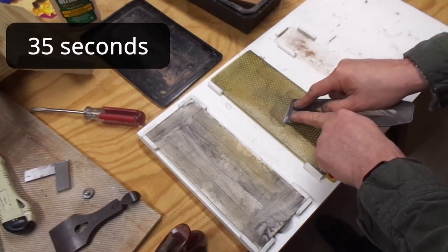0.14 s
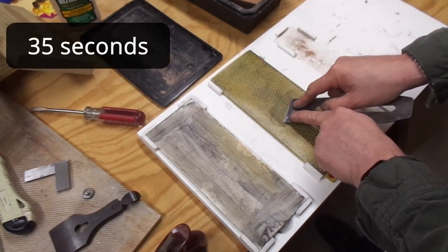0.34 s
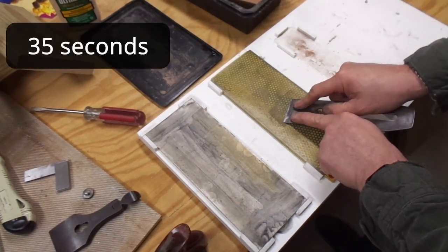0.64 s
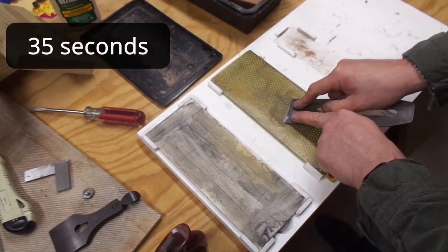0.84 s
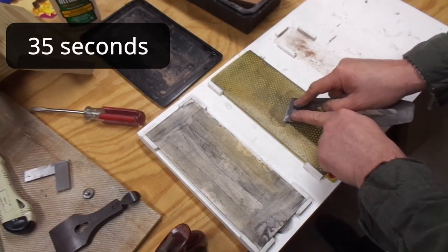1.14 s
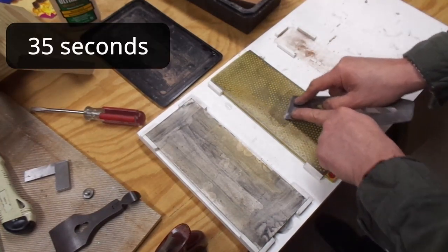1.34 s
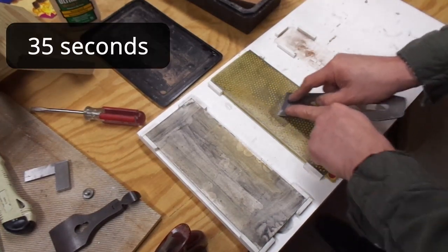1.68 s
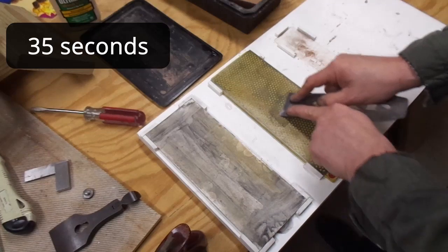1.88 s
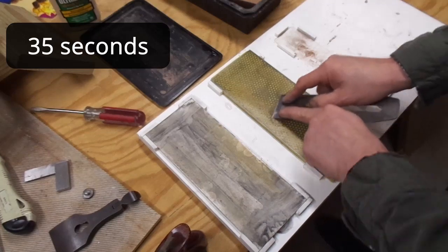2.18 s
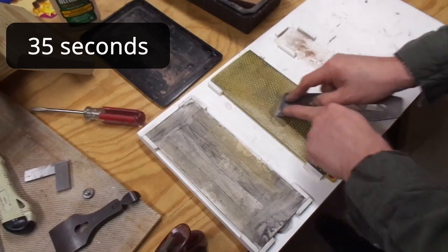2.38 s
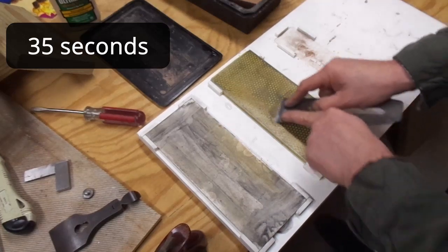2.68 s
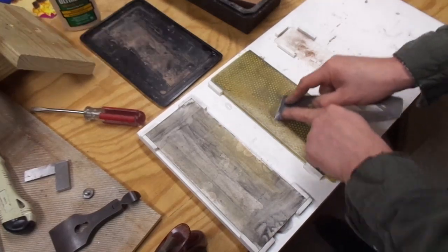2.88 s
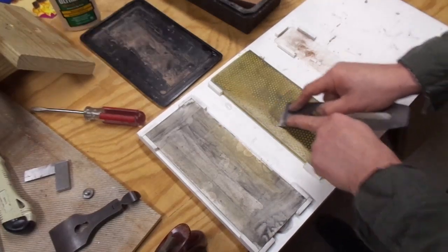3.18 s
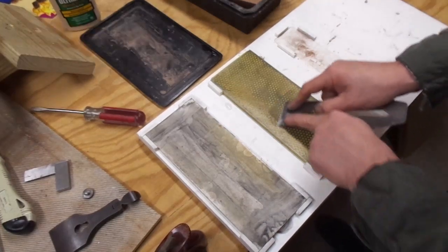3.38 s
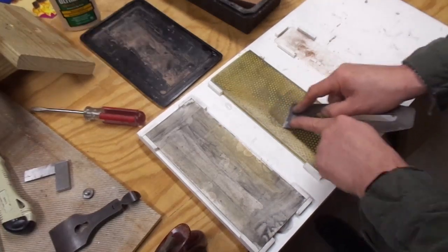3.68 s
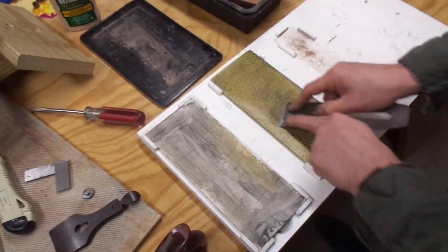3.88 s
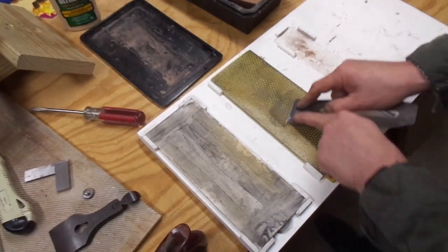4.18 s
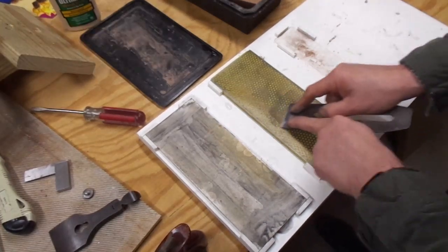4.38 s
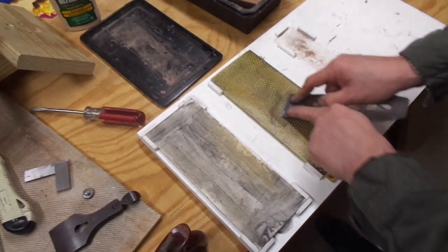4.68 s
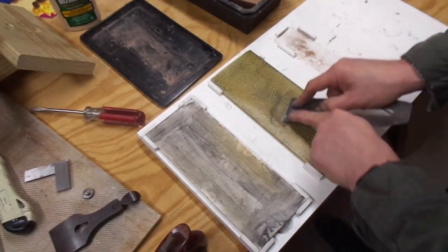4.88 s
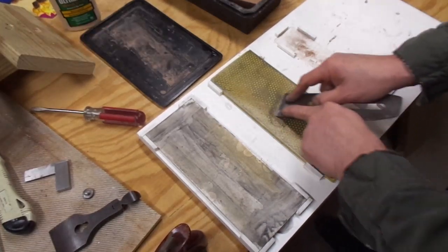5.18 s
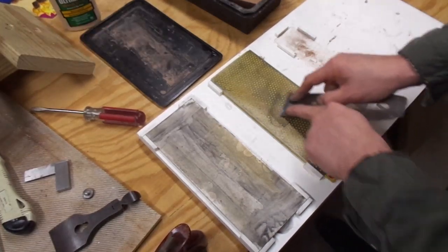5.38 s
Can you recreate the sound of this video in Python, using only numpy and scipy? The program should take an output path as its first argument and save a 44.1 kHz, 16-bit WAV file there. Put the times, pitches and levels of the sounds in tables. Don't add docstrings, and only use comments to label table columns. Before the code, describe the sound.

For the first second there is only a quiet workshop: low air hum, faintly hollow, with soft microphone hiss. At about 1.06 s a steel blade briefly touches a diamond sharpening plate, a tiny scuff, followed by a softer one near 1.15 s. At about 1.23 s it lands for good with a small knock, and fast back-and-forth rubbing begins, between five and six full strokes per second. Each forward push is a bright, gritty metallic scrape, densely ringing around three to seven kilohertz, with fine airy hiss above; the pull back is weaker and hissier. Early strokes are light and distinct with little catches at the turns. Pressure grows until about 2.9 s, then holds strong and steady, the return strokes becoming more audible. Dull plate rattle, soft wooden thrums and faint low rumble lie beneath. Pressure eases slightly near 5.5 s, still rubbing at the end. Close, dry, mono.

```python
import sys
import numpy as np
from scipy import signal
from scipy.fft import rfft, irfft, next_fast_len
from scipy.io import wavfile
from scipy.ndimage import uniform_filter1d

SR = 44100
rng = np.random.default_rng(int(sys.argv[2]) if len(sys.argv) > 2 else 0)


def waveform_to_disk(signal):
    frames = np.transpose(np.atleast_2d(signal))
    scaled = np.clip(frames, -1, 1) * 32767
    samples = np.round(scaled).astype(np.int16)
    wavfile.write(sys.argv[1], SR, samples)


def ratio(d):
    e = np.asarray(d, float) / 20
    return 10 ** e


N = 244309

# mode_hz, width_hz, level_db, swing_push_db, swing_lead_db, drift_db_per_s
SHOP_MODES = [(475, 39, -5.5, 0, 0, 0.075), (585, 35, 0.5, 0, 0, 0.2), (778, 68, -1, 0, 0, 0.12),
              (1127.5, 13, 1.5, 0, 0, 0.17), (1286, 50, -5, 0, 0, 0)]
# freq_hz, density_db
SHOP_SPECTRUM = [(10, -28), (18, -10), (42, -10.5), (95, -22.5), (330, -16.5), (1300, -13), (1500, -16),
                 (3500, -20), (6500, -25), (15200, -26)]

# land_s, lift_s, knock_db
TOUCHES = [
    (1.058, 1.098, 4.5),
    (1.136, 1.195, -2.5),
    (1.225, 6.0, 9),
]
# time_s, pressure_db
PRESSURE = [
    (1.09, -13),
    (1.18, -8),
    (1.27, -7.1),
    (1.8, -5),
    (2.3, -4),
    (2.9, 0.4),
    (3.8, 0.0),
    (4.7, 0.05),
    (5.54, -2.5),
]
# mid_s, surge_db, far_knock_db, pull_back_db
PUSHES = [(1.392, 5.5, 5.5, -0.5), (1.572, 9, 4.9, 2), (1.75, 7.5, 4.5, 1), (1.934, 9.1, 6, 3),
          (2.106, 6.5, 6.5, 2.2), (2.27, 7.5, 3.2, 4), (2.448, 7.0, 4.5, 5.0), (2.622, 5.5, 4, 3.5),
          (2.804, 6.5, 4.5, 3.5), (2.979, 4.5, 8, 4.8), (3.157, 5.3, 7, 4), (3.329, 5.5, 5.4, 3.5),
          (3.46, 5, 4.5, 4.5), (3.671, 6.5, 4.5, 3.9), (3.839, 6.5, 4, 4.5), (4.014, 5.5, 7, 4),
          (4.199, 6, 7.5, 5.9), (4.377, 4.5, 6, 6.5), (4.547, 2.5, 5, 5.5), (4.737, 5.1, 5, 6.9),
          (4.901, 3, 3.5, 6.5), (5.078, 4.5, 7, 7), (5.255, 6.5, 7.0, 8), (5.423, 4, 7.5, 7),
          (5.602, 5.5, 5.0, 2.0)]
# time_s, stall_db
STALLS = [(1.292, -3), (1.502, -3.8), (1.549, 2), (1.683, -2.0), (1.858, -3), (1.978, 3.5), (2.139, 2.2),
          (2.191, 1.5), (2.243, 1.5), (2.358, 3.5), (2.57, 3), (2.741, 4), (2.89, 2), (3.034, 2.5),
          (3.09, 2.5), (3.239, 1.9), (3.395, 1), (3.547, -1), (3.609, 2), (3.787, 2.0), (3.955, 3.5),
          (4.136, 1), (4.293, 2.4), (4.467, 3), (4.656, 2.5), (4.826, 2.5), (5.004, 3), (5.134, 3),
          (5.269, 4.9), (5.493, 1.3)]

MIDDLE_GAIN = (-49, 0.92, 0.4259, 1.34, 0.07, 0.05)
LOW_GAIN = (-55.5, 0.33, .5, 0.8, 0.11, 0.11)
UPPER_GAIN = (-59.5, 1.1, 1.07, 1.01, 0.03, 0.33)
HISS_GAIN = (-55.5, 1.17, 1.01, 0.93, 0.18, 1.3)
BENCH_GAIN = (-61, -0.08, -0.18, .25, 1.1, -0.05)
PLATE_GAIN = (-58, 0.2, -0.03, 0.93, 0.37, -0.17)

# mode_hz, width_hz, level_db, swing_push_db, swing_lead_db, drift_db_per_s
LOW_MODES = [(3165, 290, -4.5, -1, -1, 0.2), (3347, 143, -0.5, 1.7, 1, 1.4),
             (3533, 130, -4.5, 3.5, 6.5, -0.5), (3664, 106, -0.5, 3, 1.8, 0.5),
             (3905, 200, -4, -1, -1.5, 0.8), (4194, 150, -5, -3, 4.5, -1.5)]
# mode_hz, width_hz, level_db, swing_push_db, swing_lead_db, drift_db_per_s
MIDDLE_MODES = [(4570, 130, -7, 1.5, -0.5, -0.087), (4733, 88, -2, 1, 0.76, -0.038),
                (4950, 117, -8.5, 6.5, 0.67, 0.26), (5073, 130, -4, 4.5, -0.98, 0.4),
                (5243, 160, -4, 2, -1.2, -0.022), (5442, 100, -2.5, -1, -0.61, -0.25),
                (5544, 280, -8, 3.5, 0.81, -0.5), (5860, 104, -6, 5, 0.35, 0.15)]
# mode_hz, width_hz, level_db, swing_push_db, swing_lead_db, drift_db_per_s
UPPER_MODES = [(6220, 340, 0, -0.53, -0.5, 0.8), (6400, 150, -7, -0.57, -0.76, 0.2),
               (6635, 155, -1, 0.9, 0.1, -0.3), (6650, 160, 0, -0.12, 0.8, -0.6),
               (6980, 180, -1.5, -0.62, 0.5, -0.4), (7110, 100, -14, -1.8, -0.0, 0.2)]
# mode_hz, width_hz, level_db, swing_push_db, swing_lead_db, drift_db_per_s
HISS_MODES = [(7770, 300, -6.5, 1.5, -1.5, -0.9), (7850, 270, -8, 1, -0.8, -0.32),
              (8240, 140, -3, -3.5, 1, -0.2), (8490, 190, -2, 0.9, 0.7, 0.29),
              (9010, 260, -4.5, 3.5, 2, -0.32), (9620, 780, -4.5, -1.5, 1, 0.3),
              (10100, 280, -3.5, -6, 3, 0.71), (10440, 220, 1, 1, 0.55, -1.1),
              (10760, 430, -1, -1, 1, -0.74), (11400, 430, -5, 4.5, -0.071, 0.19),
              (11830, 420, -7, -6.5, -2, 0.62), (12660, 550, -8.5, -2, 2, 0.015),
              (13450, 660, -10.5, 2, -1, 0.4), (14260, 430, -11.5, -4.5, 5.5, -0.1)]
# freq_hz, density_db
SCRAPE_SPECTRUM = [(2300, -38), (2800, -8), (4300, -2.5), (6000, -15), (7300, -2), (8000, -36)]
# freq_hz, density_db
HISS_SPECTRUM = [(6600, -46), (7400, -5), (9000, -3.5), (11500, -9), (12400, -2.5), (13700, -4),
                 (15200, -11)]
# mode_hz, width_hz, level_db, swing_push_db, swing_lead_db, drift_db_per_s
BENCH_MODES = [(464, 58, -5.5, -0.78, 0.5, 0.46), (532, 56, -3, 0.11, 1.5, -0.5),
               (725, 121, 1, -0.073, -0.6, -0.65), (958, 126, -2.5, 0.32, -2.5, 0.32),
               (1150, 83, -9, 0.9, -2, 0.68), (1338, 83, -5, -0.4, -1, -0.018)]
# mode_hz, width_hz, level_db, swing_push_db, swing_lead_db, drift_db_per_s
PLATE_MODES = [(1614, 270, -8.5, -0.68, -3, 0.1), (1973, 240, -6, -0.71, 0, 0.2),
               (2230, 110, 0, 1.3, 0.5, 0.033), (2453, 203, -2, -1.2, 1.8, -0.36),
               (2790, 140, -7, -0.25, -1, -0.0)]
# mode_hz, width_hz, level_db, swing_push_db, swing_lead_db, drift_db_per_s
LEG_MODES = [(111, 61, -12.5, .5, .5, .1), (177, 77, -1, 1.1, 1.8, .1), (290, 93, -2, .1, 0.51, .1)]

LAND_S, LIFT_S, LAND_KNOCK_LAG_S = 0.034, 0.027, 0.025
SURGE_S, STALL_S = 0.03, 0.012
KNOCK_S, KNOCK_LAG_S = 0.02, 0.055
PULL_S, PULL_LAG_S = 0.042, 0.108


def level(x, rms_db):
    return x * ratio(rms_db) / np.sqrt(np.mean(x ** 2))


def colour(x, spectrum):
    hz, db = np.transpose(spectrum)
    size = next_fast_len(N)
    bin_hz = np.maximum(np.arange(size // 2 + 1) * SR / size, 1)
    gain_db = np.interp(np.log(bin_hz), np.log(hz), db, left=-80, right=-80)
    return irfft(rfft(x, size) * ratio(gain_db), size)[:N]


def walk(rate_hz):
    hold = int(SR / rate_hz)
    steps = np.repeat(rng.standard_normal(N // hold + 1), hold)
    return uniform_filter1d(uniform_filter1d(steps, hold), hold)[:N]


def stroke():
    mid_s = np.transpose(PUSHES)[0]
    return 2 * np.pi * np.interp(np.arange(N) / SR, mid_s, np.arange(len(PUSHES)))


def ring(force, modes, wander_db, rate_hz):
    push, lead = np.cos(stroke()), -np.sin(stroke())
    elapsed_s = (np.arange(N) - N // 2) / SR
    out = power = 0
    for hz, width_hz, db, push_db, lead_db, drift_db_per_s in modes:
        swing_db = push_db * push + lead_db * lead
        share = ratio(db + swing_db + drift_db_per_s * elapsed_s + wander_db * walk(rate_hz))
        stage = np.concatenate(signal.iirpeak(hz, hz / (1.55 * width_hz), fs=SR))
        plucks = np.roll(force, rng.integers(N))
        out = out + share * signal.sosfilt([stage, stage], plucks)
        power = power + share ** 2 * width_hz
    return level(out / np.sqrt(power), 0)


def shop():
    air = level(colour(rng.standard_normal(N), SHOP_SPECTRUM), -58.5)
    hum = ratio(-65) * ring(rng.standard_normal(N), SHOP_MODES, wander_db=2.0, rate_hz=2.48)
    return air + hum


def bumps(at_s, db, width_s):
    coarse_s = np.arange(N // 32 + 2) * 32 / SR
    bells = np.exp(-0.5 * ((coarse_s - at_s[:, None]) / width_s) ** 2)
    return np.interp(np.arange(N) / SR, coarse_s, (db[:, None] * bells).sum(axis=0))


def hands(*parts):
    t = np.arange(N) / SR
    push_s, surge_db, knock_db, pull_db = np.transpose(PUSHES)
    land_s, lift_s, land_db = np.transpose(TOUCHES)
    contact = 0
    for down_s, up_s in zip(land_s, lift_s):
        landing, lifting = (t - down_s) / LAND_S, 1 + (up_s - t) / LIFT_S
        contact = contact + np.clip(np.minimum(landing, lifting), 0, 1)
    pressure = np.interp(t, *np.transpose(PRESSURE))
    surges = bumps(push_s, surge_db, SURGE_S)
    stalls = bumps(*np.transpose(STALLS), STALL_S)
    knocks = bumps(push_s + KNOCK_LAG_S, knock_db, KNOCK_S)
    knocks = knocks + bumps(land_s + LAND_KNOCK_LAG_S, land_db, KNOCK_S / 2)
    pulls = bumps(push_s + PULL_LAG_S, pull_db, PULL_S)
    moves_db = np.array([np.ones(N), pressure, surges, -stalls, knocks, pulls])
    return contact * ratio(np.array(parts) @ moves_db)


def flutter():
    return ratio(0.27 * np.cos(2 * stroke() - 0.1) + 0.19 * walk(22.1))


def grit(share, spread_db):
    hit, size, sign = rng.random(N), rng.exponential(size=N), rng.standard_normal(N)
    return level((hit < share) * sign * ratio(spread_db * size), 0)


def blade():
    middle, low, upper, hiss = hands(MIDDLE_GAIN, LOW_GAIN, UPPER_GAIN, HISS_GAIN)
    grains = grit(share=0.7, spread_db=1.0)
    body = ratio(-0.42) * middle * ring(grains, MIDDLE_MODES, wander_db=2.0, rate_hz=15)
    body = body + ratio(-0.38) * low * ring(grains, LOW_MODES, wander_db=0.7, rate_hz=14)
    top_gain = hiss ** 0.84 * middle ** 0.16
    top = top_gain * level(ring(grains, HISS_MODES, wander_db=0.5, rate_hz=14), -1.07)
    edge = ratio(1.0) * upper * ring(grains, UPPER_MODES, wander_db=-0.5, rate_hz=14) + top
    shear = grit(share=0.7, spread_db=-0.5)
    edge_hiss = ratio(-5.0) * hiss * level(colour(shear, HISS_SPECTRUM), 0)
    scrape = ratio(-3) * np.sqrt(middle * upper) * level(colour(shear, SCRAPE_SPECTRUM), -3.5)
    return flutter() * (body + edge + edge_hiss + scrape)


def bench():
    top, plate = hands(BENCH_GAIN, PLATE_GAIN)
    thrum = ring(rng.standard_normal(N), BENCH_MODES, wander_db=-0.5, rate_hz=12)
    rattle = ring(rng.standard_normal(N), PLATE_MODES, wander_db=1.0, rate_hz=10)
    return top * ratio(-1.82) * thrum + plate * ratio(-1.36) * rattle


def legs():
    load = uniform_filter1d(hands(MIDDLE_GAIN)[0], size=SR // 8)
    rumble = ring(rng.standard_normal(N), LEG_MODES, wander_db=2.5, rate_hz=11)
    return load ** 0.72 * ratio(-38.0) * rumble


def room(near):
    t = np.arange(int(SR / 4)) / SR
    tail = rng.standard_normal(len(t)) * ratio(-60 * t / 0.087) * (t > 0.004)
    return ratio(-15.0) * signal.fftconvolve(near, tail / np.sqrt(np.sum(tail ** 2)))[:N]


def scene():
    air = shop()
    near = blade() + bench() + legs()
    return np.tile(near + room(near) + air, (2, 1))


def top_cut(x):
    return signal.sosfilt(signal.butter(12, 15060, fs=SR, output="sos"), x)


def record(dry):
    mix = dry - 0.00049
    return top_cut(mix)


dry = scene()
out = record(dry)
waveform_to_disk(out)
```